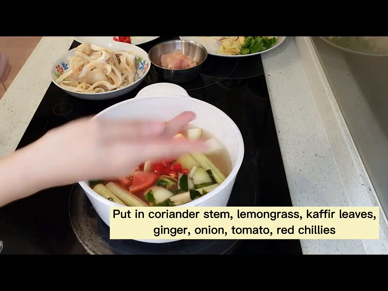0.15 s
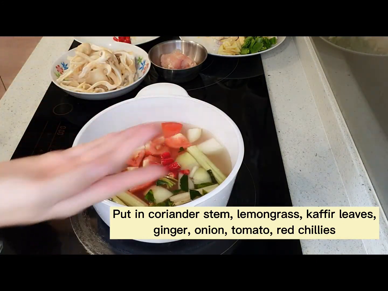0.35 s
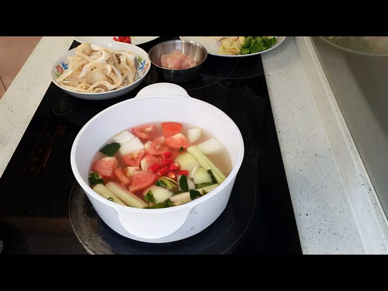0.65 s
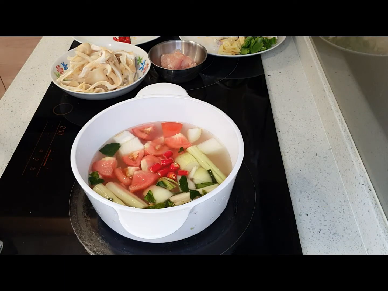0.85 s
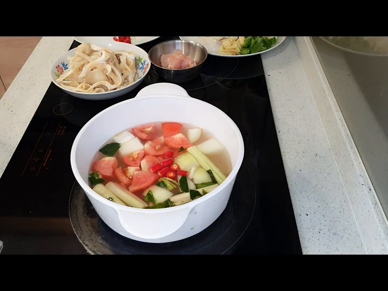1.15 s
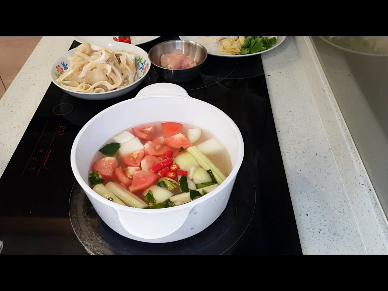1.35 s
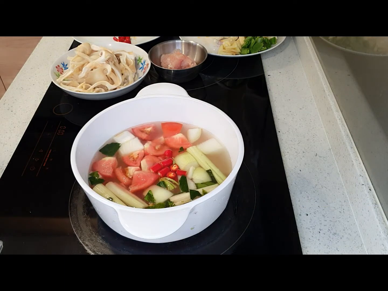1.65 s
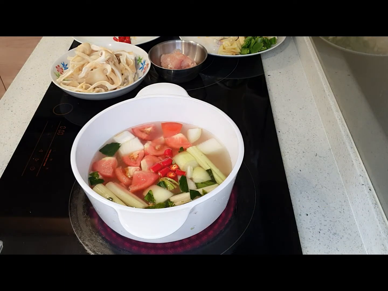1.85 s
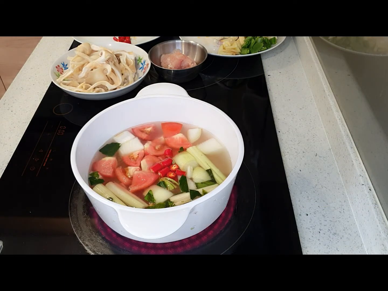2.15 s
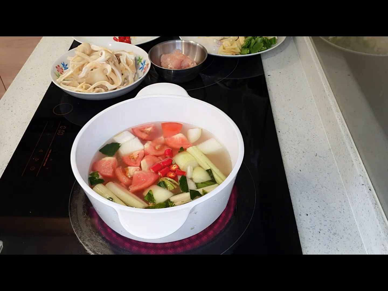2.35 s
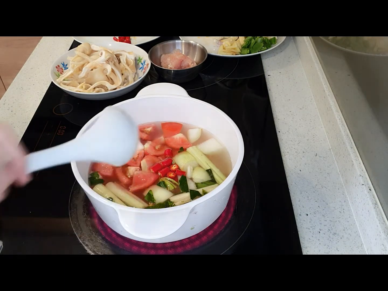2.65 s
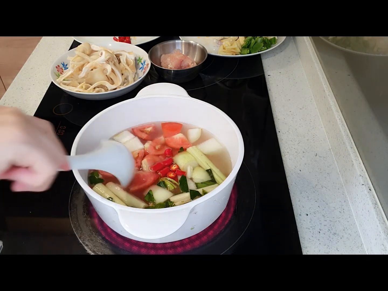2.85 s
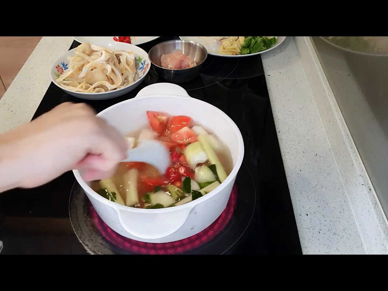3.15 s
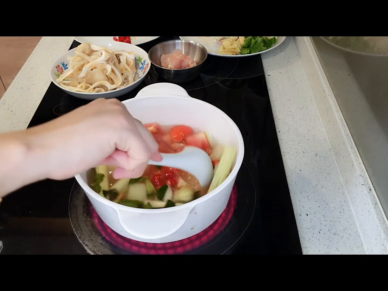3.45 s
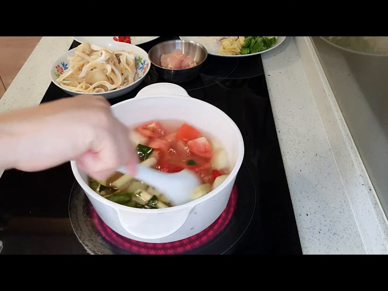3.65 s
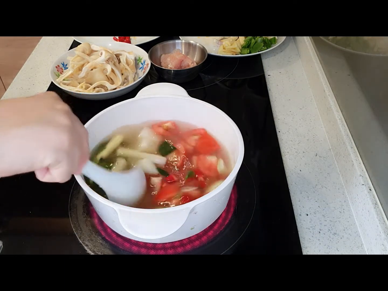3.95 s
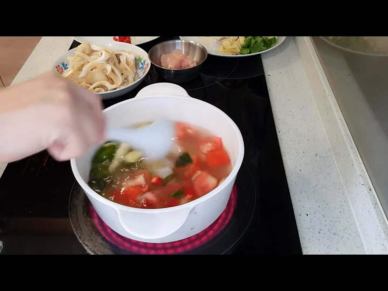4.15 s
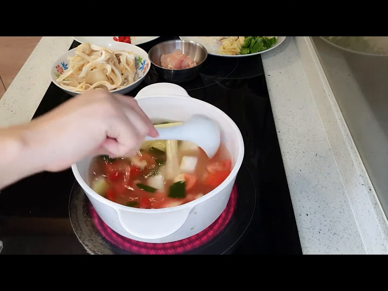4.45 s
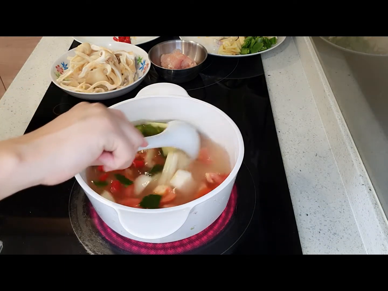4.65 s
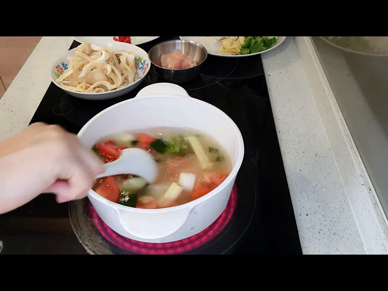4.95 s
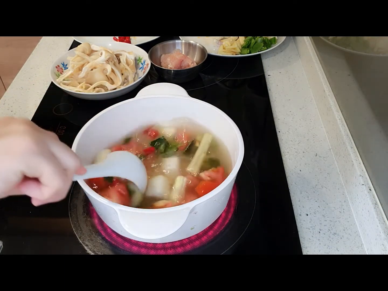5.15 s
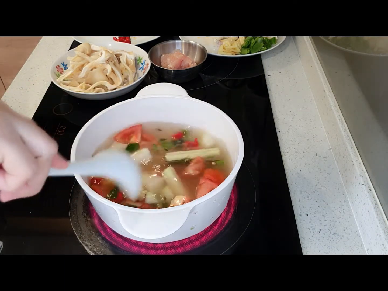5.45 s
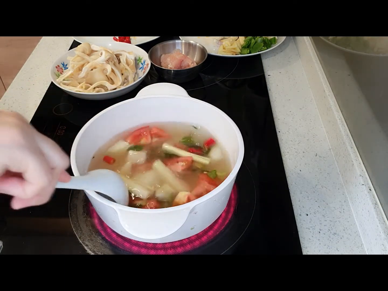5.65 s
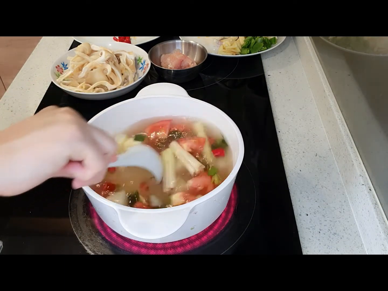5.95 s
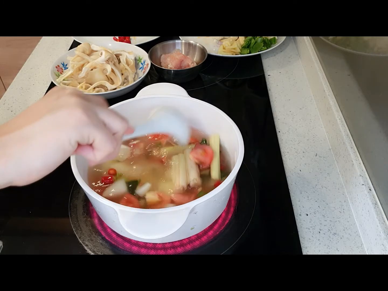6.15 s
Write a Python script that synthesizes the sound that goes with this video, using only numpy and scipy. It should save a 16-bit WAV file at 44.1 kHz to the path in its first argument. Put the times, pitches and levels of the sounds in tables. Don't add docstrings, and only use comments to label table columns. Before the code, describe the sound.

A plastic ladle clinks off a dish, then stirs soup in a ceramic pot with dull knocks, light sloshing and a rim clank over steady low hum.

```python
import sys
import numpy as np
from scipy import signal
from scipy.fft import rfft, irfft
from scipy.io import wavfile
from scipy.ndimage import uniform_filter1d

SR = 44100
rng = np.random.default_rng(int(sys.argv[2]) if len(sys.argv) > 2 else 0)


def attenuation_scalar(level_db):
    decades = np.asarray(level_db, float) / 20
    return 10 ** decades


def bounce(signal):
    frames = np.transpose(np.atleast_2d(signal))
    limited = np.clip(frames, -1, 1)
    pcm = np.round(limited * 32767).astype(np.int16)
    wavfile.write(sys.argv[1], SR, pcm)


N = 277830

DISH_HZ = [515, 960, 1400, 2000, 2470, 2700, 2995, 3860, 4587, 4678, 5491, 5873, 6385, 7542, 8400, 9240,
           10107, 11188, 13312]
RIM_HZ = [571, 1400, 1873, 2461, 2490, 3343, 3763, 3812, 3880, 4608, 5384, 5421, 7386, 8570, 10430]
POT_HZ = [850, 1080, 1270, 1397, 1660, 1827, 1938, 3190, 4285, 5270, 7900, 8807]
# level in dB, decay time t60 in seconds.
DISH_MODES = [(-4, .1), (-6, .03), (-8, .03), (-9, .08), (4, .035), (4, .035), (-2, .07), (-2, .18),
              (-1, .12), (-5, .15), (-9, .08), (4, .06), (-12, .04), (-9, .06), (-3, .03), (-3, .07),
              (0, .08), (-1, .07), (-8, .07)]
RIM_MODES = [(-20.5, 0.11), (-24, .03), (-16, .03), (-11, 0.18), (-5, 0.056), (-12, 0.012), (-8.5, 0.13),
             (-15.5, 0.27), (1, 0.057), (-38, 0.026), (-29, 0.41), (-22, 0.09), (-33, 0.073), (-16.5, .06),
             (-25, .06)]
POT_MODES = [(-3, .03), (-7, .025), (-10, .02), (-8, .025), (-8, .015), (0, .025), (-4, .045), (-14, .01),
             (-8, .012), (-20, .008), (-26, .008), (-26, .008)]
# frequency in Hz, density in dB per Hz.
DISH_CRACK = [(250, -11.5), (500, -16), (1000, 0.5), (2600, -4.5), (4500, 2), (6500, -19), (10000, -6),
              (12000, -38), (15500, -62)]
RIM_CRACK = [(300, -45), (650, -22), (1000, -26), (1600, -11), (2600, -14), (3800, 0), (4800, -22),
             (9000, -25), (13000, -36), (15500, -62)]
POT_CRACK = [(200, -22), (450, -5), (750, -1), (1700, -2), (2400, -14), (4000, -3), (6500, -21),
             (9000, -20), (13000, -33), (15500, -56)]
# frequency in Hz, level in dB, decay time t60 in seconds.
HOB_MODES = [(57, -21, 0.4), (109, 5.5, 0.073), (157, -4.5, 0.11), (255.8, -2, 0.16), (385, -10.5, 0.082),
             (620, 3, 0.024)]
# start in seconds, ring level in dB, crack level in dB,
# crack t60 in seconds, left minus right in dB.
CLINKS = [
    (2.0393, -19.5, -6, 0.026, 19),
    (2.0462, -31, -15, 0.043, -6),
    (2.0525, -31.5, -21, 0.012, 26),
    (2.131, -47, -42, 0.018, 8),
]
CLANKS = [
    (5.5518, -15, -9.5, 0.024, -5),
    (5.5555, -32, -8, 0.025, 3),
]
KNOCKS = [
    (2.8569, -77.5, -47.5, 0.023, -7.5),
    (3.0345, -21, -13, 0.023, -4.5),
    (3.0425, -19, -12.5, 0.077, 4.5),
    (3.3268, -25.5, -24.5, 0.068, -2),
    (4.8618, -37, -63, 0.026, 0.5),
    (4.878, -67, -37.5, 0.015, 7),
]
# start in seconds, level in dB.
THUMPS = [
    (2.857, -48),
    (3.036, -24.5),
    (3.104, -34),
    (3.331, -40.5),
    (4.86, -43),
    (5.599, -41.5),
]
# time in seconds, level in dB.
DRAG = [
    (1.938, -69),
    (1.966, -63.5),
    (1.992, -49.5),
    (2.003, -43.5),
    (2.019, -59),
    (2.03, -86),
]
# start in seconds, peak level in dB, pitch in Hz,
# left minus right in dB.
TICKS = [(0.536, -38, 8550, 4), (0.5372, -41, 2210, -1), (0.536, -48, 4800, 9), (2.857, -54.5, 6550, -10),
         (3.9327, -42, 3130, -9.5), (3.9351, -39.5, 9800, -3), (4.134, -63, 5500, -8),
         (4.3746, -52, 9900, -4), (4.4205, -64, 14000, -8), (4.7213, -52, 12800, -1),
         (4.7996, -55, 5500, -6), (4.8652, -30, 1300, -0.5), (5.017, -41, 3120, 0),
         (5.0965, -54.5, 12000, -4), (5.24, -63, 5300, -13), (5.2686, -49, 13500, -4),
         (5.8109, -60, 14000, -7), (6.018, -48.5, 3570, -12.5)]
DROPS = [(1.04, -62, 9400, 3), (3.5104, -47, 2900, -4.5), (3.555, -55, 2680, -2), (3.7136, -70, 5400, -8),
         (3.987, -62, 5400, -2), (4.4719, -44, 9300, 5), (4.6789, -55, 9100, 11), (4.8625, -44.5, 3030, -8),
         (4.885, -61, 2400, 1), (4.915, -46, 2270, 5), (4.993, -60, 2370, -9.5), (5.0165, -43, 9900, 1.5),
         (5.3334, -44, 9600, 6), (6.0172, -40.5, 3020, 12)]
# start in seconds, slosh level in dB,
# wash above slosh in dB, hold in seconds.
SURGES = [(-.05, -49, -17, 0.11), (0.51, -72.5, 11, 0.015), (0.96, -53.5, -7, 0.067),
          (1.195, -53.5, -27, .04), (1.415, -50.5, -1, 0.087), (2.046, -53, 0.5, 0.17),
          (2.254, -56.5, -5, 0.11), (2.463, -52.5, -6, 0.042), (3.242, -69, -1, 0.29),
          (3.723, -52.5, -21, 0.073), (4.0, -51, -14, 0.42), (4.24, -48.5, -8.5, 0.11),
          (4.636, -59.5, -9, 0.16), (4.783, -49, -1, 0.11), (5.105, -53, -13, .1), (5.68, -53, -2, 0.039),
          (5.915, -50.5, -8.5, 0.073), (6.17, -53, -8, 0.18)]
# start in seconds, fizz level in dB,
# rustle above fizz in dB, hold in seconds.
BRUSHES = [(0.52, -58.5, -12, 0.015), (1.2, -71.5, -19, 0.069), (1.397, -96.5, 27, 0.21),
           (2.203, -64, -6, 0.17), (2.443, -62.5, -8, 0.11), (3.244, -67.5, -15, 0.39),
           (3.68, -69, -14, 0.22), (3.94, -61, -23, .02), (4.193, -79, 6, .2), (4.39, -70, -4, 0.18),
           (4.71, -78, -1, 0.035), (4.957, -69, -2.5, 0.15), (5.147, -67, -9, 0.23), (5.75, -86, 27, .06)]
# frequency in Hz, density in dB per Hz.
SLOSH = [(120, 13), (250, -5), (500, 4), (850, 1), (1100, -13.5), (1600, -40.5)]
WASH = [(600, -4), (900, -0.5), (1500, -0.5), (2000, -14.5), (2400, 2), (4000, -77)]
RUSTLE = [(1500, -30), (2500, -7), (4000, 27), (6000, -25), (9000, 0), (13000, -32.5)]
FIZZ = [(4500, 9.5), (7000, 5), (9500, 4.5), (13000, 0), (15500, -39), (17000, -30)]
AIR = [(25, -38), (34, 2), (45, -12), (70, -1.5), (120, 0), (200, -8.5), (320, -11.5), (700, -16.5),
       (1500, -24.5), (3000, -30), (5000, -35.5), (9000, -41.5), (12000, -71), (15500, -100)]
# frequency in Hz, decay time t60 in seconds.
ECHO_T60 = [(60, 0.18), (500, 0.47), (2000, 0.42), (6000, 0.41), (14000, 0.31)]
# frequency in Hz, width in Hz, rms level in dB.
ROOM_TONES = [(46, 54, -63.5), (182.6, 9.5, -58.5), (272.6, 18.5, -68), (499.8, 12, -68), (6470, 21, -88)]
# frequency in Hz, left-right correlation.
LIKENESS = [(60, 0.99), (130, 0.99), (290, 0.61), (640, 0.36), (1410, -0.13), (3100, 0.0), (6820, 0.0),
            (15000, 0.02)]
# frequency in Hz, left minus right in dB.
LEAN = [(60, -.8), (180, -3.5), (550, -1.5), (1650, -1.5), (4970, -1), (15000, -1)]

EDGES = 22 * 2 ** np.arange(0, 9.9, .4)
LEFT_LAG = 6
CONTACT_S = .0009
SNAP = 6.
TICK_CYCLES, DROP_CYCLES = 1.5, 7.2
SURGE_RISE_S, SLOSH_FADE_DB_PER_S, WASH_FADE_DB_PER_S = 0.028, 31, 65
SLOSH_REST_DB, WASH_REST_DB = -70, -71
BRUSH_RISE_S, BRUSH_FADE_DB_PER_S, BRUSH_REST_DB = 0.018, 136, -78
ECHO_DB, TICK_ECHO_DB = -3, -6.5
EVEN_HZ = 250
HUM_HZ, HUM_DB = 100.0, -46.5
AIR_DB = -51


def rms_one(x):
    return x / np.sqrt(np.mean(x ** 2) + 1e-20)


def in_time(rows):
    s, *columns = np.transpose(rows)
    return [np.interp(np.arange(N) / SR, s, column) for column in columns]


def at_hz(points, hz):
    table = np.array(points)
    return np.interp(np.log(hz), np.log(table[:, 0]), table[:, 1])


def drift(rate):
    r = np.exp(-80 * np.pi * rate / SR)
    noise = rng.standard_normal(N // 40 + 2002)
    slow = signal.lfilter([1], [1, -2 * r, r * r], noise)[2000:]
    return np.interp(np.arange(N) / 40, np.arange(len(slow)), rms_one(slow))


def ring(clicks, hz, t60):
    r = attenuation_scalar(-60 / (max(t60, .0002) * SR))
    w = 2 * np.pi * hz / SR
    return signal.lfilter([0, np.sin(w)], [1, -2 * r * np.cos(w), r * r], clicks + 1e-18)


def bandpass(x, low, high, order=2):
    return signal.sosfilt(signal.butter(order, [low, high], "band", fs=SR, output="sos"), x)


def correlated_pair(mid, side, hz):
    alike = np.clip(at_hz(LIKENESS, hz), -1, 1)
    return np.sqrt(1 + alike) * mid + np.sqrt(1 - alike) * side * [[1], [-1]]


def diffuse_bands(size):
    white = rng.standard_normal((2, 2, size + 8000))
    for k, (low, high) in enumerate(zip(EDGES, EDGES[1:])):
        mid, side = bandpass(white[k % 2], low, high)[:, 8000:]
        hz = np.sqrt(low * high)
        pair = correlated_pair(mid, side, hz)
        yield hz, pair * attenuation_scalar(at_hz(LEAN, hz) / 2 * np.array([[1], [-1]]))


def coloured(x, spectrum):
    out = 0
    for k, (low, high) in enumerate(zip(EDGES[7:], EDGES[8:])):
        gain = (-1) ** k * attenuation_scalar(at_hz(spectrum, np.sqrt(low * high)))
        out = out + gain * bandpass(x, low, high)
    return out


def add(out, sound, s, lean_db):
    for side, lag in ((0, LEFT_LAG), (1, 0)):
        at = round(s * SR) + lag
        part = out[side, at:at + len(sound)]
        part += sound[:len(part)] * attenuation_scalar(lean_db / 2 * (-0.5 - 2 * side))


def blows(hits, pitches, modes, crack):
    out = np.zeros((2, N))
    t = np.arange(SR // 2) / SR
    click = 1. * (t == 0)
    for s, ring_db, crack_db, crack_t60, lean_db in hits:
        strength = attenuation_scalar(rng.normal(0, 1, len(modes))) * (-1) ** np.arange(len(modes))
        tones = 0
        for hz, (db, t60), share in zip(pitches, modes, strength):
            tones = tones + attenuation_scalar(db) * share * ring(click, hz, t60)
        tones = tones * (1 - np.exp(-t / CONTACT_S))
        noise = rng.standard_normal(len(t)) + SNAP * click
        burst = coloured(noise * attenuation_scalar(-60 * t / max(crack_t60, .002)), crack)
        burst = burst / np.abs(burst).max()
        add(out, attenuation_scalar(ring_db) * tones + attenuation_scalar(crack_db) * burst, s, lean_db)
    return out


def thumps():
    push = np.zeros(N)
    for s, db in THUMPS:
        push[round(s * SR)] = attenuation_scalar(db)
    push = np.convolve(push, np.hanning(60) / 30)[:N]
    return sum(attenuation_scalar(db) * ring(push, hz, t60) for hz, db, t60 in HOB_MODES) * np.ones((2, 1))


def drag():
    start_s, end_s = DRAG[0][0], DRAG[-1][0]
    start, size = round(start_s * SR), SR // 2
    level = attenuation_scalar(in_time(DRAG)[0])[start:start + size]
    level = level * (np.arange(size) < (end_s - start_s) * SR)
    slips = (rng.random(size) < .2) * rng.standard_normal(size)
    slips = rms_one(slips) * level
    dull = signal.lfilter([.3], [1, -.7], slips)
    scrape = bandpass(slips, 400., 2700., order=4)
    squeak = attenuation_scalar(-15) * ring(slips, 3110, .05) + attenuation_scalar(-22) * ring(slips, 4400, .05)
    body = sum(attenuation_scalar(db) * ring(dull, hz, t60) for hz, (db, t60) in zip(DISH_HZ, DISH_MODES))
    out = np.zeros((2, N))
    add(out, attenuation_scalar(-31.0) * body + attenuation_scalar(18.5) * scrape + squeak, start_s, -3.)
    return out


def ticks():
    out = np.zeros((2, N))
    t = np.arange(SR // 8) / SR
    rows = [(*row, TICK_CYCLES) for row in TICKS] + [(*row, DROP_CYCLES) for row in DROPS]
    for s, peak_db, hz, lean_db, cycles in rows:
        swell = 1 - np.exp(-2.0 * t * hz)
        tone = swell * attenuation_scalar(-20 * t * hz / cycles) * np.sin(2 * np.pi * hz * t)
        noise = bandpass(rng.standard_normal(len(t)), hz, hz * 1.09, order=1)
        spray = rms_one(noise) * attenuation_scalar(-24. - 60 * t / 0.043)
        add(out, attenuation_scalar(peak_db + 13.5) * (tone + spray), s, lean_db)
    return out


def swells(starts, peaks_db, holds, rise_s, fade_db, rest_db):
    since = np.arange(0, N + 64, 64) / SR - np.array(starts)[:, None]
    fade = fade_db * np.clip(since - rise_s - np.abs(holds)[:, None], 0, None)
    each = np.clip(since / rise_s, 0, 1) ** 2 * attenuation_scalar(np.array(peaks_db)[:, None] - fade)
    total = np.sqrt(np.sum(each ** 2, axis=0) + attenuation_scalar(rest_db) ** 2)
    return np.interp(np.arange(N) / 64, np.arange(since.shape[1]), total)


def stirring():
    s, slosh_db, wash_db, hold = np.transpose(SURGES)
    b, fizz_db, rustle_db, last = np.transpose(BRUSHES)
    brush = BRUSH_RISE_S, BRUSH_FADE_DB_PER_S, BRUSH_REST_DB
    slosh = swells(s, slosh_db, hold, SURGE_RISE_S, SLOSH_FADE_DB_PER_S, SLOSH_REST_DB)
    wash = swells(s, slosh_db + wash_db, hold, SURGE_RISE_S, WASH_FADE_DB_PER_S, WASH_REST_DB)
    rustle = swells(b, fizz_db + rustle_db, last, *brush)
    fizz = swells(b, fizz_db, last, *brush)
    return [slosh, wash, rustle, fizz]


def kitchen(x, gap_s):
    t = np.arange(SR * 3 // 5) / SR
    tail = sum(pair * attenuation_scalar(-60 * t / at_hz(ECHO_T60, hz)) for hz, pair in diffuse_bands(size=len(t)))
    bins = rfft(tail)
    power = uniform_filter1d(np.abs(bins) ** 2, round(EVEN_HZ * len(t) / SR), axis=1)
    tail = irfft(bins / np.sqrt(power + 1e-9), len(t))
    onset = np.clip(t / gap_s, 0, 1)
    ending = np.clip(10 * (t[-1] - t) - 1, 0, 1)
    tail = tail * onset * ending / np.sqrt(np.sum(tail ** 2) / 2)
    return signal.fftconvolve(x, tail, axes=1)[:, :N]


def hum():
    out = np.sqrt(2) * attenuation_scalar(HUM_DB + .5 * drift(5.4)) * np.sin(2 * np.pi * HUM_HZ * np.arange(N) / SR)
    out = out * attenuation_scalar([[-.4], [.4]])
    for hz, width_hz, level_db in ROOM_TONES:
        t60 = np.log(1000) / np.pi / width_hz
        mid, side = (rms_one(ring(rng.standard_normal(N), hz, t60)) for _ in range(2))
        out = out + attenuation_scalar(level_db + 1.5) * correlated_pair(mid, side, hz)
    return out


def background():
    colours, levels = (SLOSH, WASH, RUSTLE, FIZZ), stirring()
    air, moving, together = 0, [0, 0, 0, 0], drift(22.0)
    for hz, pair in diffuse_bands(size=N):
        air = air + pair * attenuation_scalar(at_hz(AIR, hz) + 1.3 * drift(2.5))
        lumpy = pair[:, ::-1] * attenuation_scalar(together + drift(15))
        moving = [layer + lumpy * attenuation_scalar(at_hz(colour, hz)) for layer, colour in zip(moving, colours)]
    stirred = sum(rms_one(layer) * level for layer, level in zip(moving, levels))
    return attenuation_scalar(AIR_DB) * rms_one(air) + stirred


def scene():
    hard = blows(CLINKS, DISH_HZ, DISH_MODES, DISH_CRACK) + blows(CLANKS, RIM_HZ, RIM_MODES, RIM_CRACK)
    hard = hard + blows(KNOCKS, POT_HZ, POT_MODES, POT_CRACK) + thumps() + drag()
    small = ticks()
    echo = kitchen(attenuation_scalar(ECHO_DB) * hard + attenuation_scalar(TICK_ECHO_DB) * small, gap_s=0.003)
    return hard + small + echo + hum() + background()


def low_pass(x):
    return signal.sosfilt(signal.butter(12, 16340, fs=SR, output="sos"), x)


def record(dry):
    mix = signal.sosfilt(signal.butter(8, 38, "high", fs=SR, output="sos"), dry)
    mix = signal.sosfilt(signal.cheby2(10, 45, 15900, fs=SR, output="sos"), mix)
    return low_pass(mix)


dry = scene()
out = record(dry)
bounce(out)
```